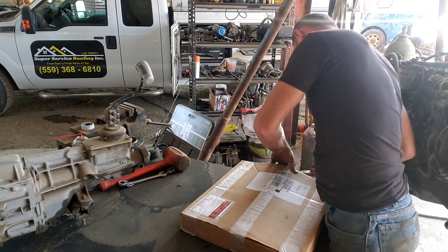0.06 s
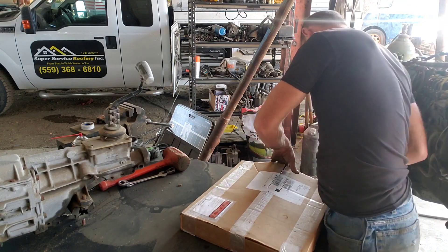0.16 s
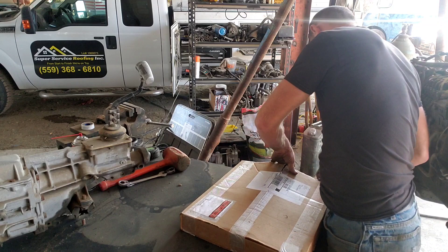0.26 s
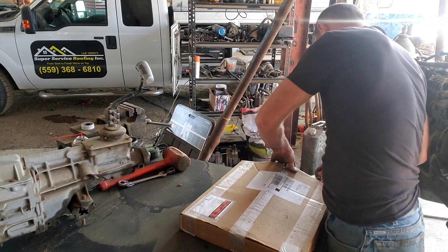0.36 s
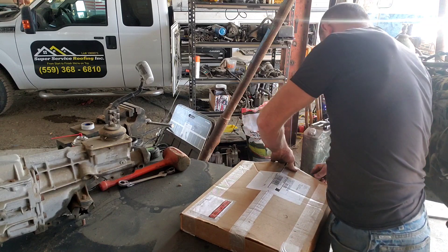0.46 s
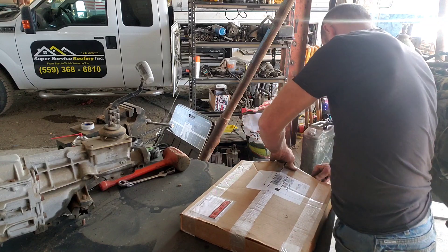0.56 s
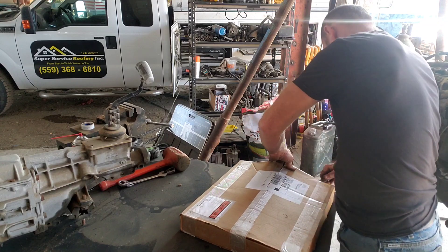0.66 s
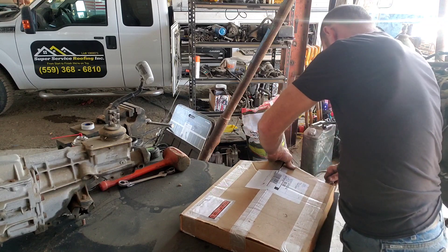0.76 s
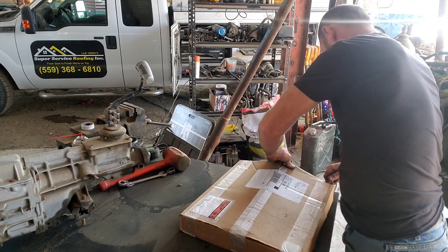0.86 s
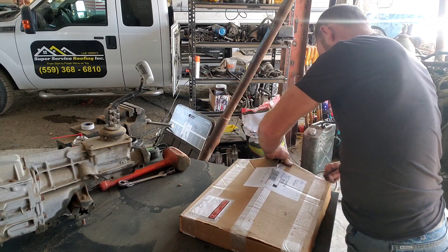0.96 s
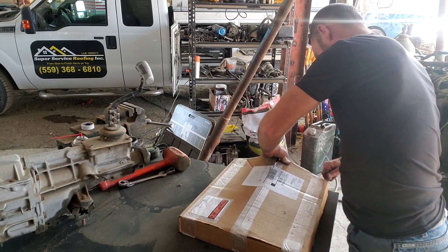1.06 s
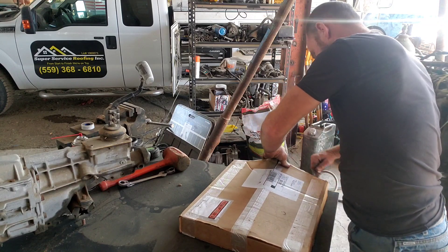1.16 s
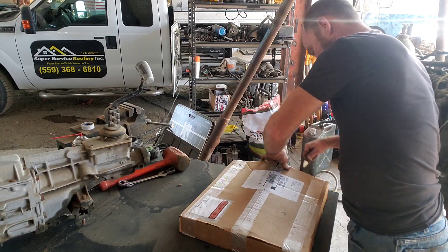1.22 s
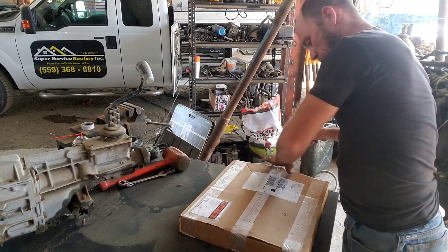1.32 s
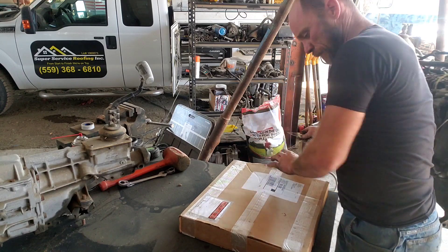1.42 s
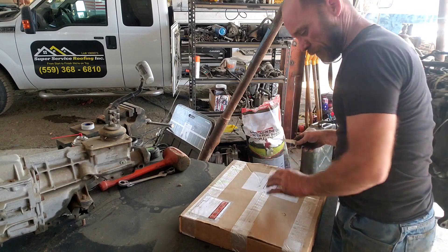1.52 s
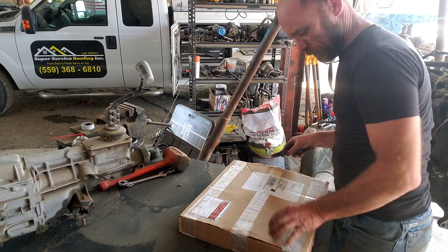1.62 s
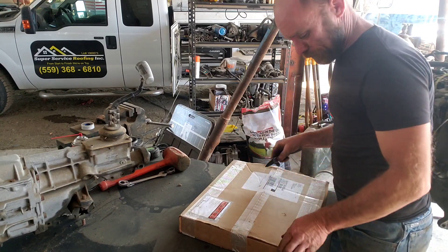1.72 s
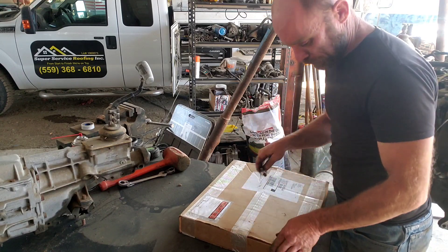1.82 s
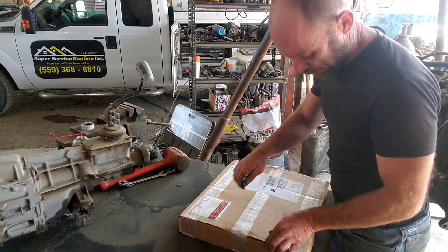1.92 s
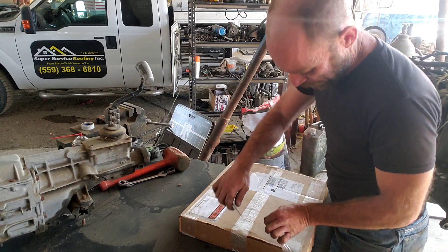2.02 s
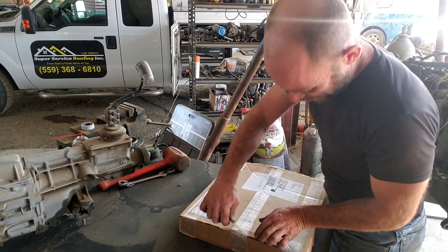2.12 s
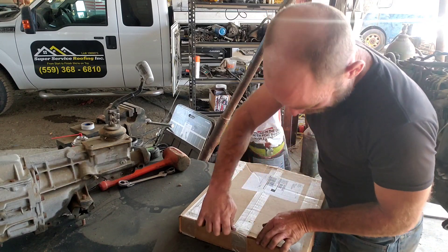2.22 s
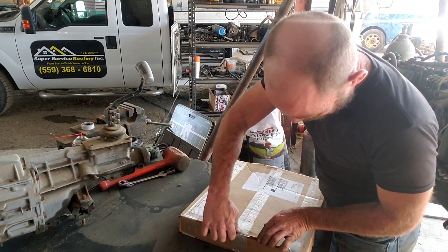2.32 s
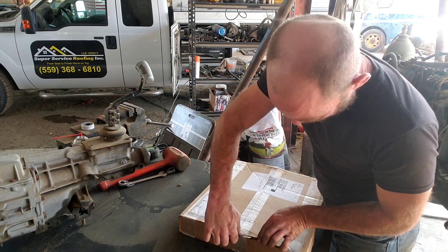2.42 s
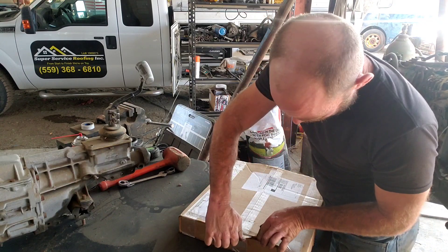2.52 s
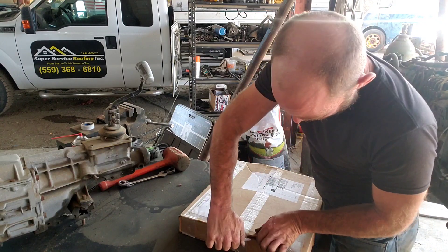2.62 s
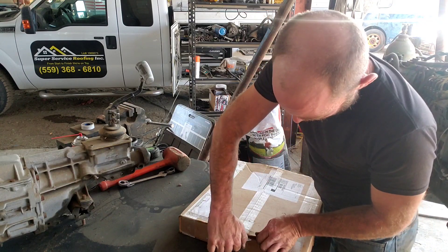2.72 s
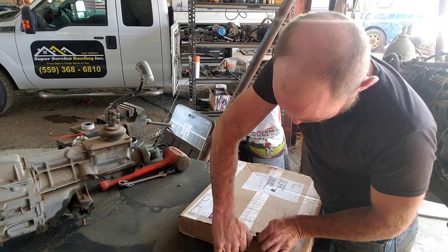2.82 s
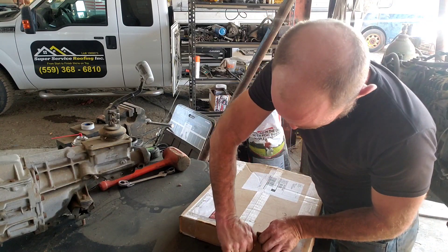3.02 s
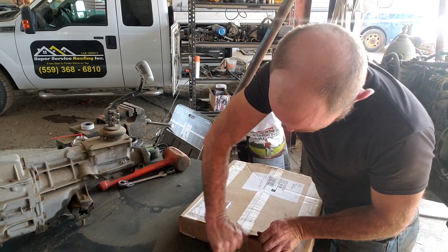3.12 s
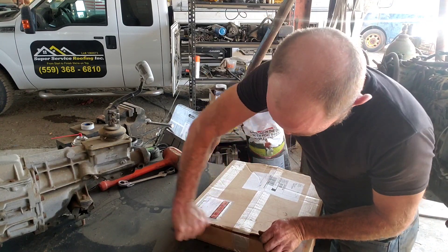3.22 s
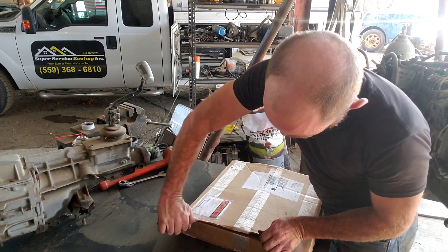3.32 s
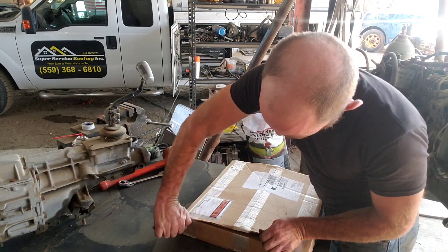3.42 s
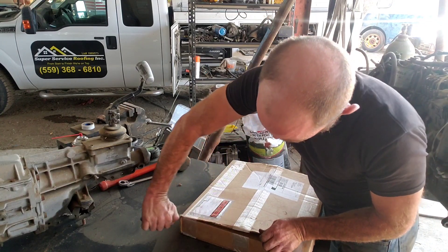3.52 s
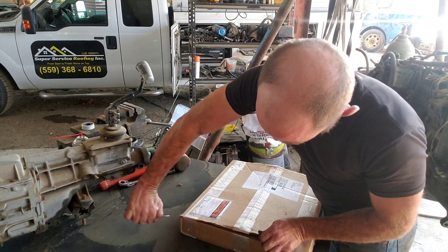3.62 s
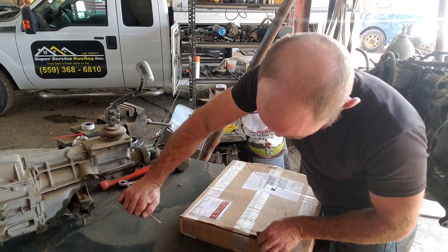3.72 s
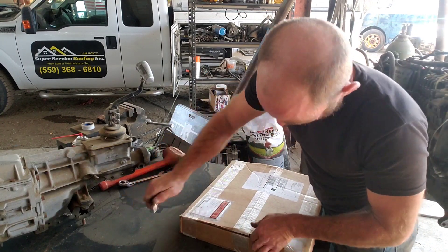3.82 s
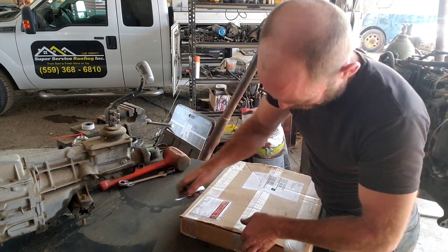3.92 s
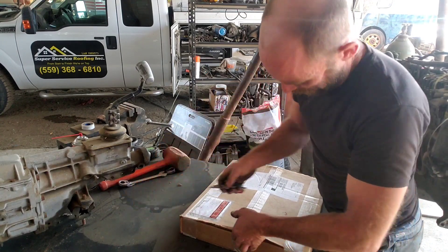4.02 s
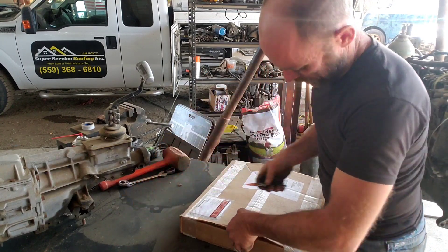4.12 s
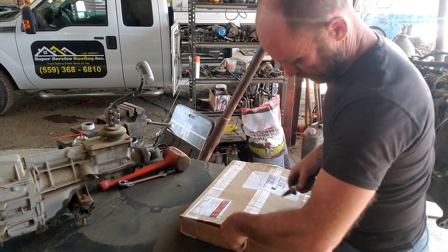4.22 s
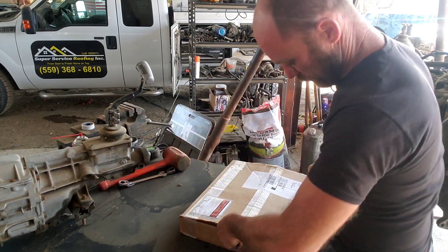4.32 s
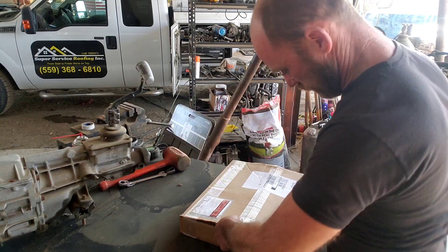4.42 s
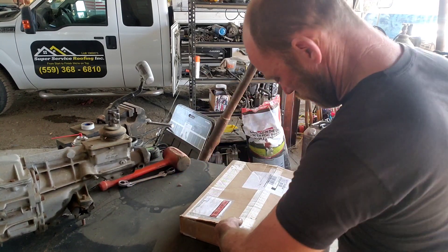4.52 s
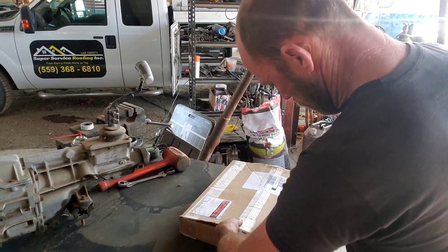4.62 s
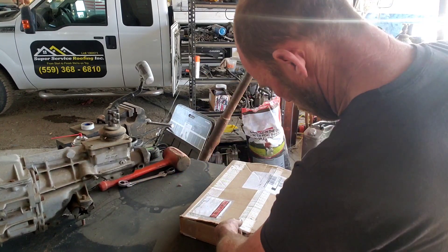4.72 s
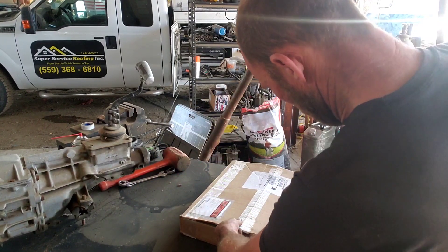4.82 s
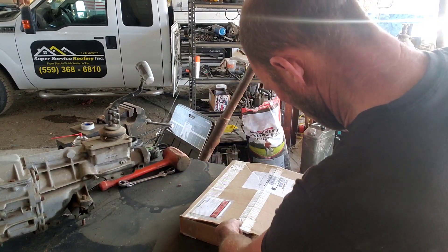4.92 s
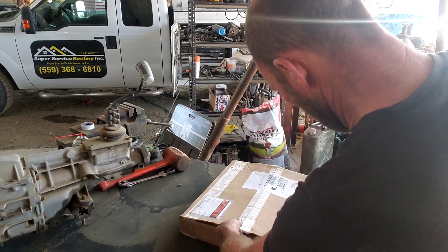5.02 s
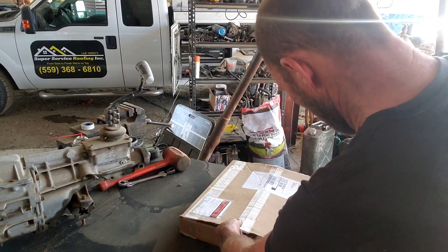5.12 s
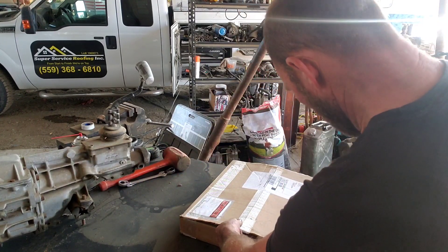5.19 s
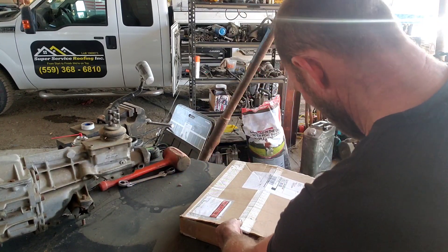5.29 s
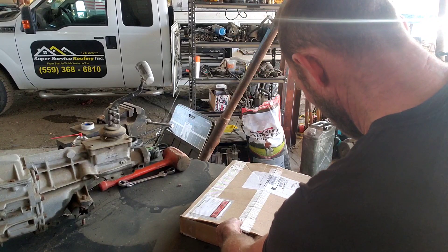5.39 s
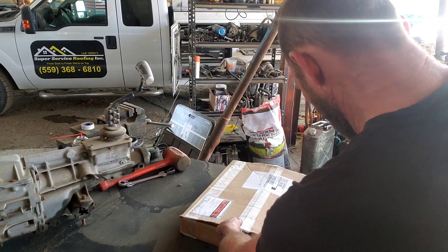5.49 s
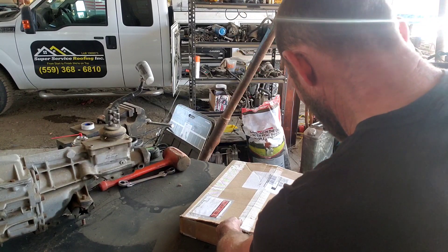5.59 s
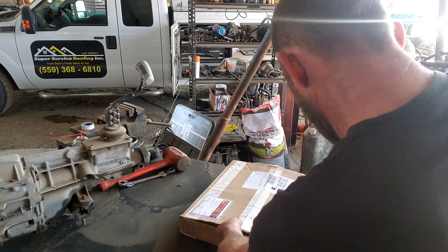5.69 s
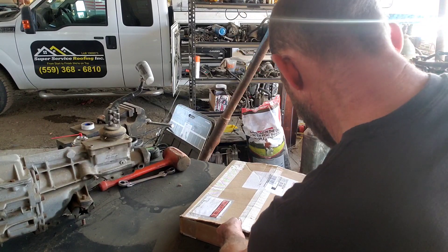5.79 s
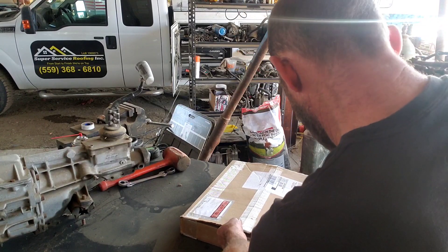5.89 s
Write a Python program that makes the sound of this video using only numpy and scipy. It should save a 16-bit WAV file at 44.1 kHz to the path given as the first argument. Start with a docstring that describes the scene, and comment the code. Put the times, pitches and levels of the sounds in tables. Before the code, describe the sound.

Hands rub a box, then tape pulls away in gritty bursts with hollow cardboard knocks and one sharp loud pop. After a quieter spell of thin slitting sounds comes another rapid run of tears, then soft handling, a smooth swish and a juddering scrape on the bench. Quiet, cluttered workshop with short reflections, faint distant rumble, microphones nearby.

```python
"""Packing tape off a cardboard box

Packing tape is slit and ripped off a box on a bench in a quiet workshop, over a low, distant rumble.
Glue and fibres let go in dense tiny snaps, which crackle and drive the modes of flaps and panels.
Hands rub and shift the box: finer snaps for rubs, a swish and scuffs; a noisy resonance for a dragged flap.
Knocks ring band-limited box modes. Reflections shift; each of two microphone ports has its own colour.
"""
import sys
import numpy as np
from scipy import signal
from scipy.fft import rfft, irfft
from scipy.io import wavfile
from scipy.ndimage import uniform_filter1d

SR = 44100
rng = np.random.default_rng(int(sys.argv[2]) if len(sys.argv) > 2 else 0)


def write(x):
    x = np.atleast_2d(x).T
    wavfile.write(sys.argv[1], SR, np.round(np.clip(x, -1, 1) * 32767).astype(np.int16))


N = 262394
TIME_S = np.arange(N) / SR
TAIL_S = TIME_S[:SR // 2]

# Event levels are relative: source gains, room and ports follow.
# hands rubbing on the box: (start [s], rise [s], hold [s], hiss [dB], box [dB])
RUBS = [(0.0, 0.0018, 0.0086, -70, -54), (0.07, 0.034, 0.022, -59, -53.5),
        (0.175, 0.0053, 0.0095, -60.5, -50.5), (0.252, .008, .014, -55, -46), (0.31, 0.032, 0.13, -70, -61),
        (1.76, 0.014, 0.055, -59.5, -67), (2.62, .06, .03, -72, -54), (2.99, .06, .04, -72, -53),
        (3.74, 0.028, 0.056, -63.5, -53), (3.85, 0.022, 0.19, -61.5, -59.5),
        (4.11, 0.052, 0.13, -61.5, -59.5), (4.33, 0.051, 0.033, -64, -55.5), (4.56, 0.034, 0.086, -67, -61),
        (4.67, .035, 0.12, -60.5, -49), (5.28, 0.053, 0.025, -58.5, -55),
        (5.47, 0.076, 0.045, -67.5, -57.5)]
# short rips: (start [s], length [s], crackle [dB], flap rasp [dB])
RIPS = [(0.285, 0.0033, -49, -36), (0.699, 0.011, -45, -37), (0.846, 0.012, -39, -31),
        (1.0462, 0.011, -49, -46), (1.0534, .006, -27, -17), (1.358, .0065, -47.5, -49),
        (2.052, 0.012, -51.5, -54), (1.388, 0.0089, -45.5, -44), (3.1472, 0.0015, -28, -32),
        (3.218, .008, -38, -27.5), (3.233, 0.0087, -34, -29.5), (3.4585, 0.0025, -37, -35.5),
        (3.4842, 0.011, -40, -38.5), (3.518, 0.0094, -38.5, -31), (3.54, 0.0075, -30.5, -30),
        (3.556, .01, -34.5, -29), (3.61, .006, -38, -34), (3.636, 0.0091, -32.5, -30.5),
        (4.9832, 0.0011, -32, -44), (5.8, 0.0089, -47, -36.5)]
# knocks on the box: (start [s], peak [dB], contact pitch [Hz])
KNOCKS = [(0.287, -29.5, 313), (0.473, -31.5, 660), (0.545, -36.5, 455), (0.583, -36, 370),
          (0.788, -21, 130), (0.852, -21.5, 296), (1.054, -19, 950), (1.059, -10, 150), (1.22, -29, 79),
          (1.368, -33.5, 260), (2.156, -46, 300), (2.947, -52, 550), (3.147, -34.5, 200), (3.251, -18, 236),
          (3.561, -29, 350), (3.642, -22.5, 277), (5.0719, -25, 650), (5.579, -45, 786), (5.638, -30, 796),
          (5.664, -34, 400), (5.900, -32, 734)]
# a flap drags with a hollow rub: (start [s], rise [s], hold [s], level [dB])
DRAG = [(0.474, .006, 0.15, -49.5)]
# the thin film ticks and zips: (start [s], length [s], level [dB])
TICKS = [(0.56, 0.0013, -49), (0.574, 0.0032, -55), (0.583, 0.0033, -43), (0.594, .0014, -46),
         (2.057, 0.012, -45.5), (2.459, 0.0025, -41.5), (2.553, 0.0027, -52), (2.676, 0.0024, -40.5),
         (3.025, 0.0014, -56), (3.305, 0.046, -37.5), (3.608, .0096, -28), (5.071, 0.0026, -45.5)]
# the blade slides through the tape film: (start [s], rise [s], hold [s], hiss [dB], flap rasp [dB])
SLITS = [(1.92, 0.089, 0.032, -48.5, -62), (2.18, 0.01, 0.021, -50, -62), (2.465, 0.011, 0.095, -66, -74.5),
         (2.6, 0.059, 0.035, -62.5, -61.5), (2.75, 0.016, 0.014, -58, -79),
         (3.01, 0.036, 0.019, -51.5, -56.5)]
# long pulls on the tape: (start [s], rise [s], hold [s], crackle [dB], flap rasp [dB], panel boom [dB])
PULLS = [(0.64, 0.012, 0.0046, -52, -47.5, -36.5), (0.695, 0.021, 0.11, -50.5, -39, -35),
         (0.93, 0.046, 0.12, -67.5, -60.5, -53), (1.055, .012, 0.012, -46.5, -41.5, -40),
         (1.15, 0.035, 0.058, -63, -52.5, -45), (1.32, 0.022, 0.021, -60.5, -54.5, -48),
         (3.15, 0.054, 0.018, -43.5, -35.5, -44), (3.25, 0.022, 0.076, -50, -43, -37.5),
         (3.475, 0.088, 0.024, -50, -44.5, -35), (3.61, 0.016, 0.013, -52.5, -44.5, -43)]
# a smooth, quick swish over the cardboard: (start [s], rise [s], hold [s], level [dB])
SWISH = [(4.785, 0.056, 0.085, -42.5)]
# the box scuffs over the bench: (start [s], rise [s], hold [s], hiss [dB], box [dB])
SCUFFS = [(5.615, .03, .03, -52, -39.5), (5.782, 0.022, 0.021, -53, -38), (5.85, 0.023, 0.091, -57, -48)]

# box modes: (frequency [Hz], relative level [dB], t60 [s])
BOX = [(130, -13.5, 0.023), (150.8, -17.5, 0.19), (184, 4.5, 0.034), (197.2, -25, 0.088),
       (243, -12.5, 0.095), (314, -8, 0.044), (361, -8, 0.053), (437.3, -11, 0.098), (461, -7, 0.034),
       (550.4, -8, 0.061), (602, -7.5, 0.034), (714, -5.5, 0.04), (755, -4, 0.029), (867, -7, 0.035),
       (950, -6, 0.027), (1090, -3.5, 0.015), (1255, -7, 0.017), (1366, -17, 0.038), (1756, -10.5, 0.012)]
# spectrum shape of skin on tape and cardboard: (frequency [Hz], relative density [dB])
RUB_COLOUR = [(150, -47), (1000, -14), (1800, -6), (3000, -10), (5000, -10.5), (7000, -3), (9000, -2.5),
              (12000, -6.5), (16000, -3)]
# spectrum shape of tearing glue and fibres: (frequency [Hz], relative density [dB])
CRACKLE_COLOUR = [(150, -32.5), (600, -7.5), (1300, 6), (2000, 5.5), (3600, 0.5), (5200, -2.5), (7000, 3),
                  (9000, 4.5), (12000, 4), (16000, 0.5)]
# spectrum shape of the slit film: (frequency [Hz], relative density [dB])
FILM_COLOUR = [(300, -7), (1500, -15.5), (2400, -15.5), (3300, -5), (5000, -7.5), (7000, 1.5), (9000, 4.5),
               (11500, 6), (14000, 2.5), (16000, 3.5)]
# spectrum shape of the swish: (frequency [Hz], relative density [dB])
SWISH_COLOUR = [(200, -15), (700, -8), (1200, -3.5), (2000, -0.5), (3400, -2), (5000, -9.5), (7000, -10.5),
                (10000, -12.5), (16000, -23)]
# spectrum shape of cardboard on the bench: (frequency [Hz], relative density [dB])
SCUFF_COLOUR = [(150, -25), (1000, -8), (2000, 0.5), (3500, -6.5), (7000, -7.5), (11000, -2),
                (16000, -12.5)]
# spectrum shape of the background rumble: (frequency [Hz], relative density [dB])
FLOOR_COLOUR = [(20, -21), (35, -15), (55, 4), (80, -3), (120, -4.5), (200, -17), (300, -18.5), (500, -36),
                (1000, -36.5), (2500, -46.5), (5000, -52.5), (6200, -43), (7100, -38), (8500, -43),
                (16000, -39.5)]
# response of the left microphone port: (frequency [Hz], gain [dB])
LEFT_PORT = [(60, 0.5), (350, 1.5), (700, 1), (1300, 1), (3000, 7), (5500, 7.5), (7100, 8), (8400, -3),
             (11000, -1), (16000, -2)]
# response of the right microphone port: (frequency [Hz], gain [dB])
RIGHT_PORT = [(60, 1.5), (350, 2), (700, -1.5), (1300, -5.5), (2400, -4), (4500, -6.5), (6500, -13),
              (8200, -16.5), (9800, -6.5), (11500, 1), (16000, -8.5)]
# left-right likeness of diffuse sound: (frequency [Hz], correlation [-1..1])
LIKENESS = [(60, 0.85), (200, 0.79), (650, 0.74), (1400, 0.26), (3000, 1), (7000, 0)]
# decay of the room: (frequency [Hz], t60 [s])
ROOM_T60 = [(100, 0.18), (300, 0.34), (900, 0.36), (3000, 0.11), (7000, 0.099), (15000, 0.24)]

FIBRE_HZ = np.geomspace(900, 15000, num=14)
PANEL_TOP_HZ = 460  # big panels below, flaps and walls above
PANEL_LAG_S = 0.0096  # big panels take up the load later than the tape
DRAG_START_HZ, DRAG_SAG_HZ_PER_S = 657, 1700
CONTACT_SPAN = 1.8  # a contact drives the modes within this ratio of its pitch
FLOOR_DB, CUTOFF_HZ = -55.5, 15700


def from_db(db):
    """Decibels to gain."""
    return 10 ** (np.asarray(db) / 20)


def rms_one(x):
    """Scale a signal to rms 1."""
    return x / np.sqrt(np.mean(x ** 2) + 1e-20)


def energy_one(x):
    """Scale an impulse response so that it keeps the level of white noise."""
    return x / np.sqrt(np.sum(x ** 2) + 1e-20)


def local_rms(x, size=250):
    """Running rms over a window of size samples."""
    return np.sqrt(np.abs(uniform_filter1d(x ** 2, size=size)) + 1e-9)


def at_hz(points, hz):
    """Read a table on a log-frequency axis."""
    table_hz, value = np.transpose(points)
    return np.interp(np.log(np.maximum(hz, 1)), np.log(table_hz), value)


def through(x, response):
    """Convolve, keeping the length of the scene; returns rows."""
    return signal.fftconvolve(np.atleast_2d(x), np.atleast_2d(response), axes=-1)[:, :N]


def colour(spectrum, size=4096):
    """Causal (minimum-phase) impulse response of a spectrum, by folding its cepstrum."""
    gain = from_db(at_hz(spectrum, np.fft.rfftfreq(size, 1 / SR)))
    cepstrum = irfft(np.log(gain))
    cepstrum[1:size // 2] *= 2
    cepstrum[size // 2 + 1:] = 0
    return irfft(np.exp(rfft(cepstrum)), size)


def slow_noise(hz):
    """Random wavering up to a given rate, rms 1."""
    lowpass = signal.butter(2, hz, fs=SR, output="sos")
    return rms_one(signal.sosfilt(lowpass, rng.standard_normal(N)))


def wavering(seconds, hz, count=1500):
    """Random values, hz of them a second, joined by straight lines."""
    return np.interp(seconds * hz, np.arange(count), rng.standard_normal(count))


def diffuse(count):
    """White stereo noise whose channels correlate by frequency as in LIKENESS."""
    mid, side = rfft(rng.standard_normal((2, count)))
    alike = np.clip(at_hz(LIKENESS, np.fft.rfftfreq(count, 1 / SR)), -1, 1)
    mid = np.sqrt((1 + alike) / 2) * mid
    side = np.sqrt((1 - alike) / 2) * side
    return irfft(mid + side * [[1], [-1]], count)


def strokes(rows, swell_db, fall_db_per_s):
    """Each stroke swells, holds and dies away within a second; one gain curve for each dB column."""
    t = TIME_S[:SR]
    out = np.zeros((len(rows[0]) - 3, N + SR))
    touch = np.clip(t / .003, 0, 1)
    for start_s, rise_s, hold_s, *levels_db in rows:
        to_go = 1 - np.clip(t / max(rise_s, .001), 0, 1)
        fallen_db = np.clip(fall_db_per_s * (t - rise_s - hold_s), 0, 120)
        force = touch * from_db(-swell_db * to_go - fallen_db)
        at = int(start_s * SR)
        out[:, at:at + SR] += np.outer(from_db(levels_db), force)
    return out[:, :N]


def burst(length_s):
    """Force over a sudden slip: strongest at once, then easing."""
    return rms_one(np.linspace(1, .45, int(length_s * SR) + 2))


def snaps(per_s, spread_db, clump_db, clump_hz):
    """Tiny breaks of uneven size, in clumps as the contact sticks and slips; the mean force stays even."""
    at = np.flatnonzero(rng.random(N) < per_s / SR)
    size_db = spread_db * np.minimum(rng.exponential(1, N)[at], 4)
    size_db = size_db + clump_db * slow_noise(clump_hz)[at]
    clicks = np.zeros(N)
    clicks[at] = from_db(size_db) * np.sign(rng.random(N)[at] - .5)
    return clicks / local_rms(clicks, size=1300)


def fibres(clicks, sharpness=1.5, plain_db=-7, shift_db=3.5, shift_hz=18):
    """Each break rings briefly at the pitch of its own scrap; the favoured pitches shift."""
    at = np.flatnonzero(clicks)
    dealt = rng.integers(0, len(FIBRE_HZ), N)[at]
    rings = 0
    for k, hz in enumerate(FIBRE_HZ):
        own = at[dealt == k]
        favour = from_db(shift_db * wavering(own / SR, shift_hz))
        drive = np.full(N, 1e-18)
        drive[own] = clicks[own] * favour / hz ** (1 / 4)
        rings = rings + signal.lfilter(*signal.iirpeak(hz, sharpness, fs=SR), drive)
    rings = rms_one(rings) + from_db(plain_db) * clicks
    # the pitch changes, the energy of the breaks does not
    return rings * local_rms(clicks) / local_rms(rings)


def friction(clicks, spectrum, surface, rasp, boom):
    """The same breaks radiate from the surface and drive the flaps and big panels: three rows."""
    hiss = through(fibres(clicks) * surface, energy_one(colour(spectrum)))[0]
    return np.array([hiss, clicks * rasp, clicks * boom])


def box_ring(low_hz, high_hz):
    """Impulse response of the box modes in a range: decaying sines of alternating sign."""
    ring = 0
    for k, (hz, db, t60_s) in enumerate(BOX):
        if low_hz <= hz < high_hz:
            decay = from_db(db - 60 * TAIL_S / t60_s)
            ring = ring + (-1) ** k * decay * np.sin(2 * np.pi * hz * TAIL_S)
    return ring


def box(hiss, rasp, boom):
    """Flaps and panels ring with the forces on them."""
    flaps = through(rasp, energy_one(box_ring(PANEL_TOP_HZ, SR)))[0]
    panels = through(boom, energy_one(box_ring(0, PANEL_TOP_HZ)))[0]
    return hiss + flaps + panels


def rumble():
    """Low, distant rumble: steady diffuse noise with a coloured spectrum."""
    return from_db(FLOOR_DB) * through(diffuse(N), energy_one(colour(FLOOR_COLOUR)))


def rubs(hiss_db=-0.5, rasp_db=-9, boom_db=-3):
    """Skin slides on tape and cardboard with a fine grain."""
    hiss, press = strokes(RUBS, swell_db=12.5, fall_db_per_s=203)
    clicks = snaps(per_s=15000, spread_db=2.5, clump_db=3.0, clump_hz=70.0)
    rasp, boom = press * from_db(rasp_db), press * from_db(boom_db)
    return friction(clicks, RUB_COLOUR, hiss * from_db(hiss_db), rasp, boom)


def rips(boom_db=-8):
    """A short length of tape lets go at once: a burst of breaks."""
    clicks = snaps(per_s=7500, spread_db=6.5, clump_db=-1.5, clump_hz=400)
    crackle, rasp = np.zeros((2, N))
    for start_s, length_s, crackle_db, rasp_db in RIPS:
        force = burst(length_s)
        at = int(start_s * SR) + np.arange(len(force))
        clicks[at] = rms_one(clicks[at])
        crackle[at] = force * from_db(crackle_db)
        rasp[at] = force * from_db(rasp_db)
    return friction(clicks, CRACKLE_COLOUR, crackle, rasp, rasp * from_db(boom_db))


def knocks():
    """A soft contact drives the low modes; a blow near a stiff edge drives the high ones."""
    out = np.zeros(N + len(TAIL_S))
    ring = box_ring(0, SR)
    for start_s, peak_db, hz in KNOCKS:
        blow = signal.lfilter(*signal.butter(2, hz * CONTACT_SPAN, fs=SR), ring)
        blow = signal.lfilter(*signal.butter(2, hz / CONTACT_SPAN, "high", fs=SR), blow)
        at = int(start_s * SR)
        out[at:at + len(blow)] += from_db(peak_db) * blow / np.abs(blow).max()
    return out[:N]


def drag(width_hz=160, hiss_db=-18):
    """Friction hisses faintly and feeds one broad resonance that sinks as the free part of the flap grows."""
    force, = strokes(DRAG, swell_db=18, fall_db_per_s=498.5)
    hz = DRAG_START_HZ - DRAG_SAG_HZ_PER_S * np.maximum(TIME_S - DRAG[0][0], 0)
    phase = 2 * np.pi * np.cumsum(np.maximum(hz, 0)) / SR
    hollow = slow_noise(width_hz) * np.cos(phase) + slow_noise(width_hz) * np.sin(phase)
    hiss = from_db(hiss_db) * rng.standard_normal(N)
    return force * (hollow + hiss)


def blade(hiss_db=-2, rasp_db=-3, boom_db=-3):
    """The taut film hisses thinly along the blade and ticks where it catches."""
    hiss, rasp = strokes(SLITS, swell_db=16, fall_db_per_s=306) * from_db([[hiss_db], [rasp_db]])
    for start_s, length_s, db in TICKS:
        hiss[int(start_s * SR):int((start_s + length_s) * SR) + 2] += from_db(db)
    clicks = snaps(per_s=11000, spread_db=-0.5, clump_db=2.5, clump_hz=150)
    return friction(clicks, FILM_COLOUR, hiss, rasp, rasp * from_db(boom_db))


def pulls(crackle_db=3.0, rasp_db=-2, boom_db=-2):
    """Tape peels and splits under a steady pull; the panels follow late."""
    crackle, rasp, boom = strokes(PULLS, swell_db=11, fall_db_per_s=157)
    boom = np.interp(TIME_S - PANEL_LAG_S, TIME_S, boom)
    clicks = snaps(per_s=4500, spread_db=5.5, clump_db=1.0, clump_hz=140)
    rasp, boom = rasp * from_db(rasp_db), boom * from_db(boom_db)
    return friction(clicks, CRACKLE_COLOUR, crackle * from_db(crackle_db), rasp, boom)


def swish(level_db=1.5):
    """A fast, light slide: the grains merge into a hiss."""
    clicks = snaps(per_s=20000, spread_db=3.0, clump_db=-0.3, clump_hz=122)
    speed, = strokes(SWISH, swell_db=28, fall_db_per_s=140)
    return from_db(level_db) * through(clicks * speed, energy_one(colour(SWISH_COLOUR)))[0]


def scuffs(hiss_db=-1, rasp_db=0.5, boom_db=-6):
    """The bottom of the box judders over the bench."""
    hiss, press = strokes(SCUFFS, swell_db=11, fall_db_per_s=447)
    clicks = snaps(per_s=3500, spread_db=2.5, clump_db=-1.5, clump_hz=121)
    rasp, boom = press * from_db(rasp_db), press * from_db(boom_db)
    return friction(clicks, SCUFF_COLOUR, hiss * from_db(hiss_db), rasp, boom)


def reflections(near_db=-3.0, near_t60_s=0.028, room_db=-6.5, bass_db=-6):
    """From one spot on the box: quick scatter from bench and clutter, then a tail that dies band by band."""
    noise = rfft(diffuse(len(TAIL_S)))
    hz = np.fft.rfftfreq(len(TAIL_S), 1 / SR)
    edges_hz = np.geomspace(40, 20480, num=10)
    near = energy_one(from_db(-60 * TAIL_S / near_t60_s) * (TAIL_S > .0005))
    out = 0
    for low_hz, high_hz in zip(edges_hz, edges_hz[1:]):
        centre_hz = np.sqrt(low_hz * high_hz)
        decay = from_db(-60 * TAIL_S / at_hz(ROOM_T60, centre_hz))
        far = energy_one(decay * (1 - np.exp(-TAIL_S / .005)))
        # long waves pass the clutter, so the bass scatters less
        scatter = from_db(near_db + at_hz([(300, bass_db), (1500, 0)], centre_hz))
        band = irfft(noise * (hz >= low_hz) * (hz < high_hz), len(TAIL_S))
        out = out + band * np.hypot(scatter * near, from_db(room_db) * far)
    return out


def workshop(work, direct_db=-1.0, wander_hz=7, left_lead_s=0.00013, count=4):
    """The sounding spot wanders over the box, so the pattern of reflections keeps shifting."""
    shares = np.array([slow_noise(wander_hz) for _ in range(count)])
    shares = shares / np.sqrt(np.sum(shares ** 2, axis=0) + 1e-9)
    direct = np.array([work, np.interp(TIME_S - left_lead_s, TIME_S, work)])
    reflected = sum(through(work * share, reflections()) for share in shares)
    return from_db(direct_db) * direct + reflected


def scene():
    """All work on the box sounds in the room, over the rumble."""
    forces = pulls() + rips() + blade() + rubs() + scuffs()
    work = box(*forces) + swish() + drag() + knocks()
    floor = rumble()
    return workshop(work) + floor


def record(dry, low_cut_hz=42):
    """Each port colours its channel; the lowest bass and the top are cut."""
    heard = through(dry, [colour(LEFT_PORT), colour(RIGHT_PORT)])
    heard = signal.sosfilt(signal.butter(2, low_cut_hz, "high", fs=SR, output="sos"), heard)
    return signal.sosfilt(signal.ellip(10, .1, 80, CUTOFF_HZ, fs=SR, output="sos"), heard)


dry = scene()
out = record(dry)
write(out)
```